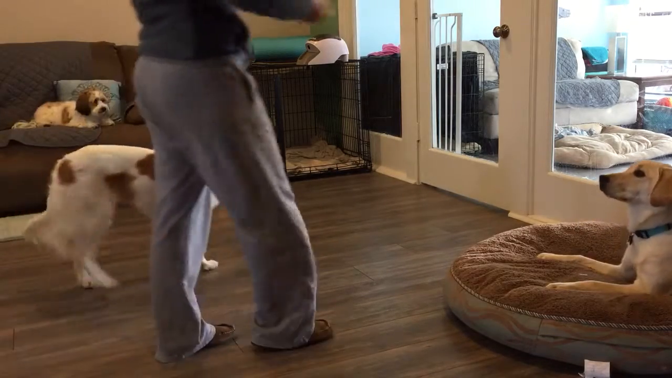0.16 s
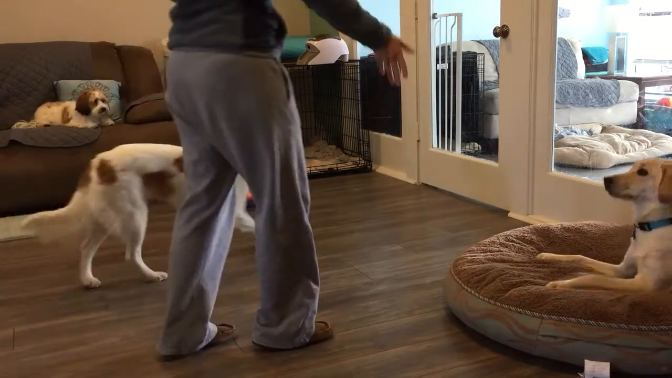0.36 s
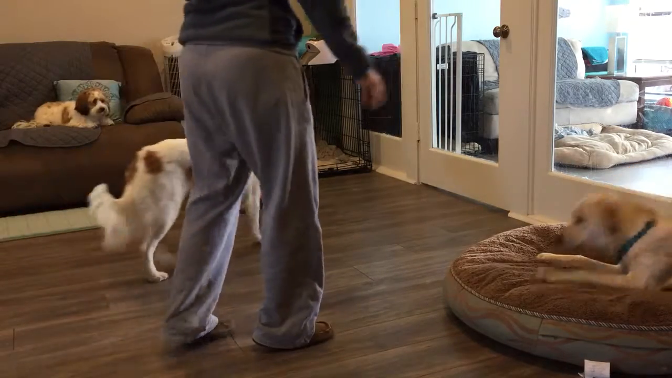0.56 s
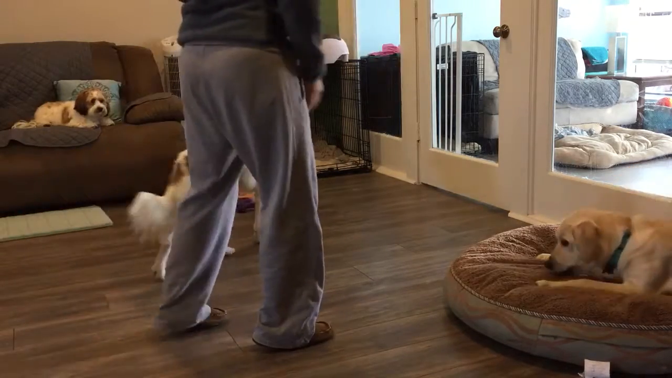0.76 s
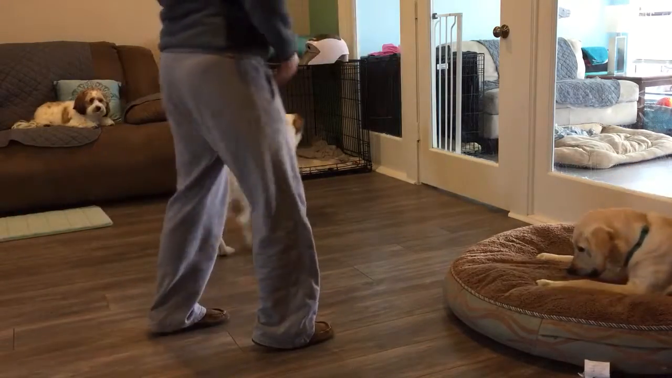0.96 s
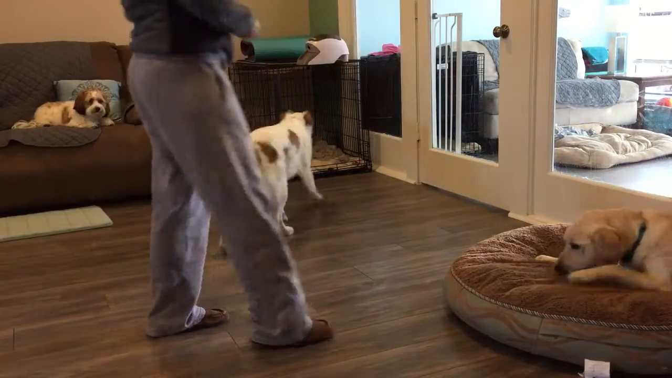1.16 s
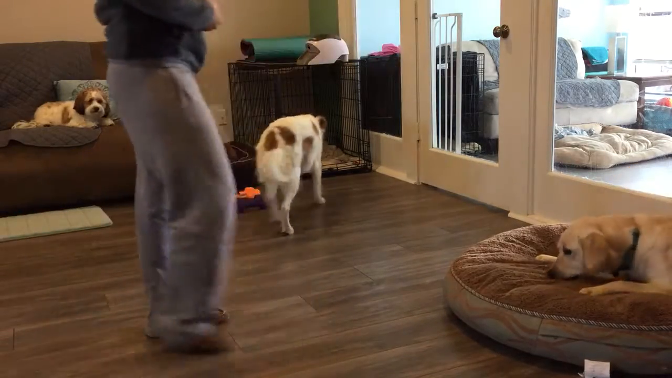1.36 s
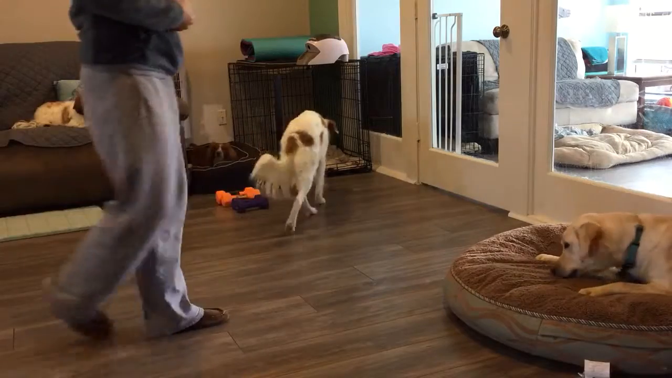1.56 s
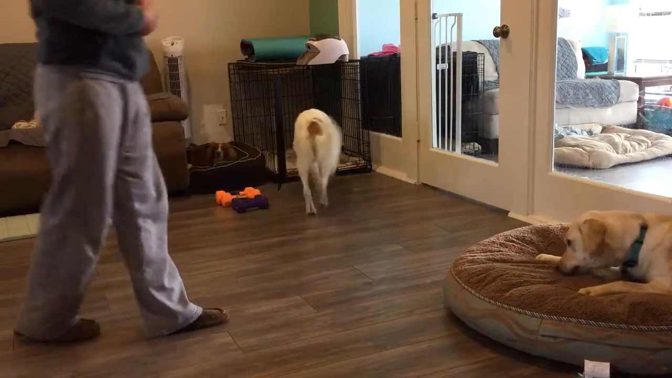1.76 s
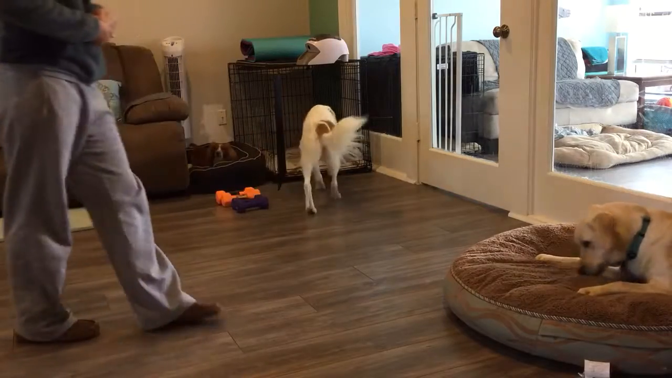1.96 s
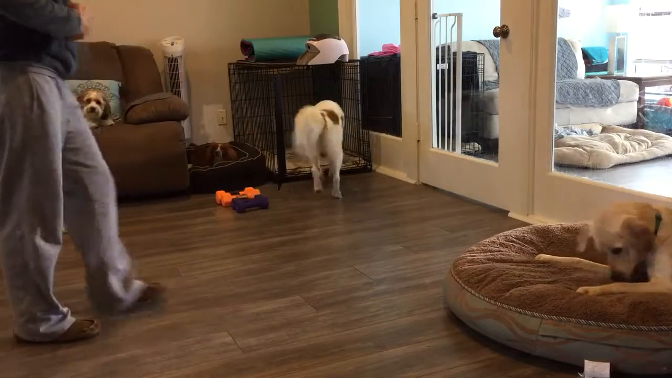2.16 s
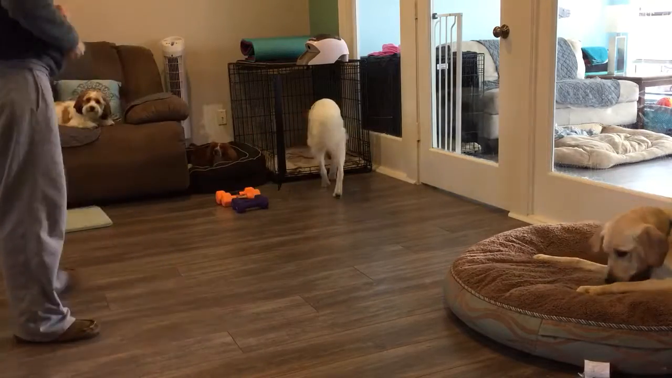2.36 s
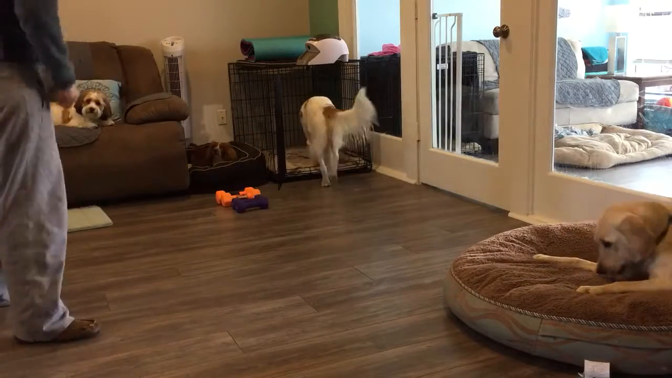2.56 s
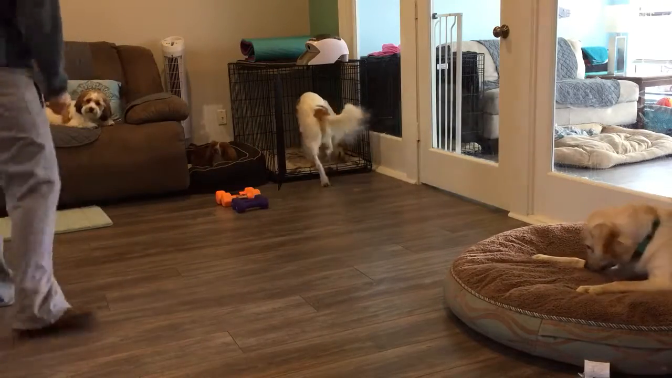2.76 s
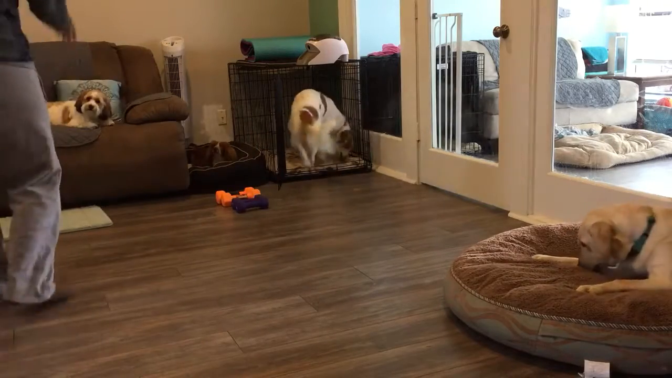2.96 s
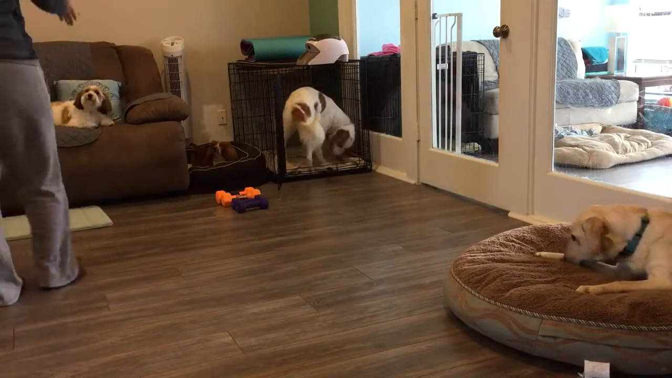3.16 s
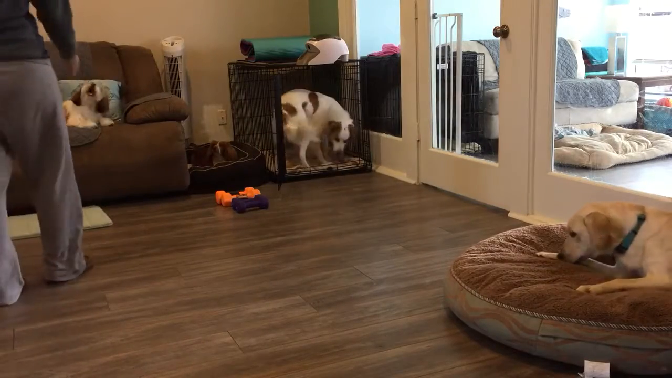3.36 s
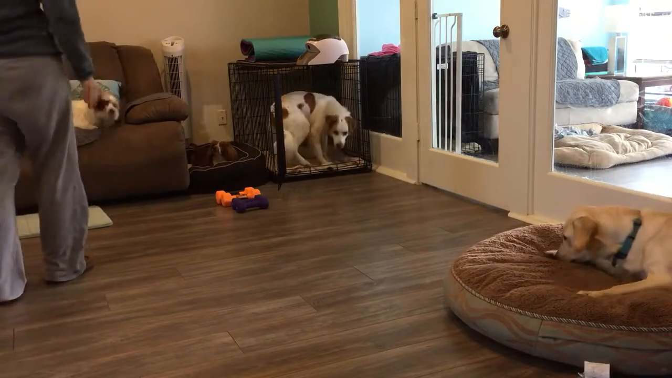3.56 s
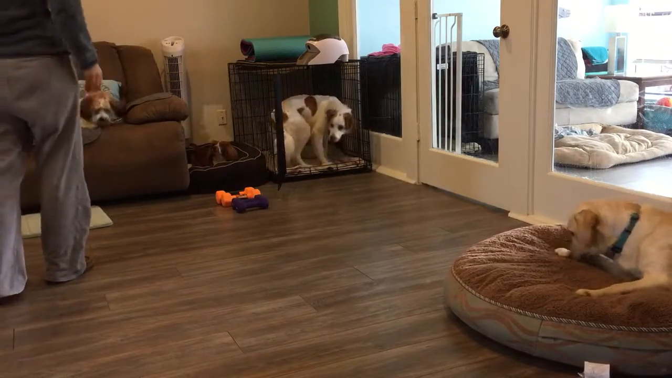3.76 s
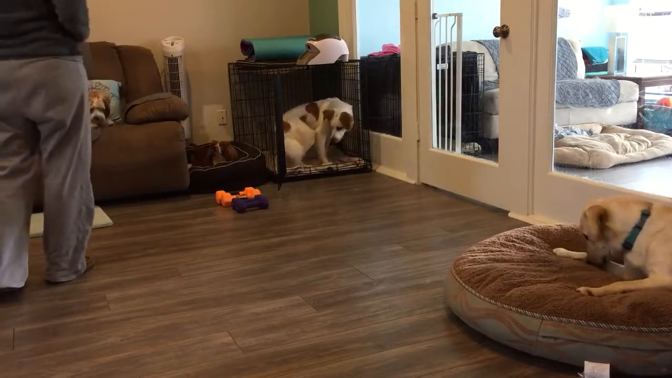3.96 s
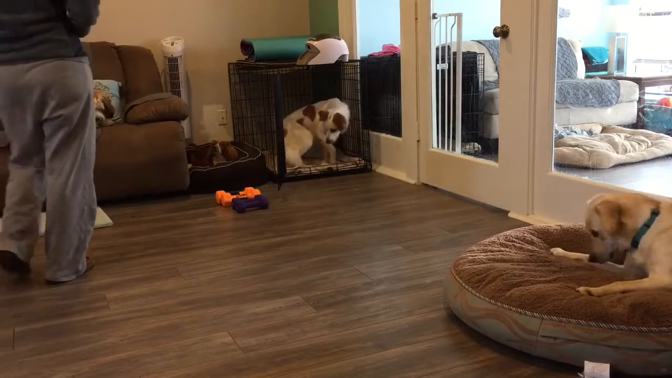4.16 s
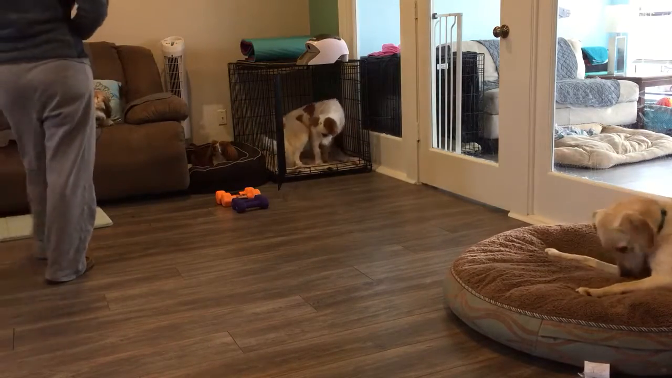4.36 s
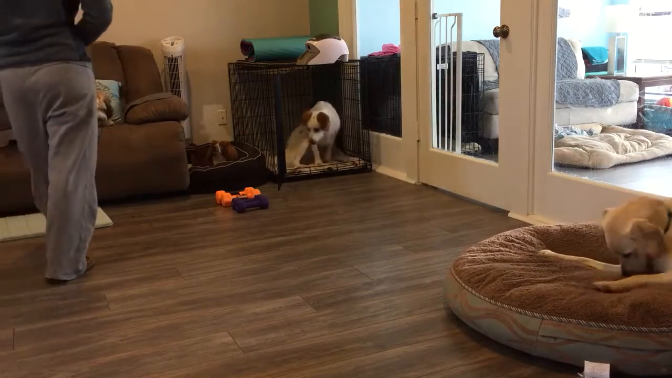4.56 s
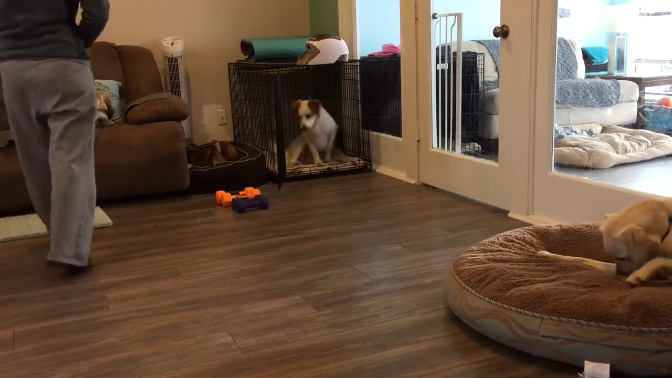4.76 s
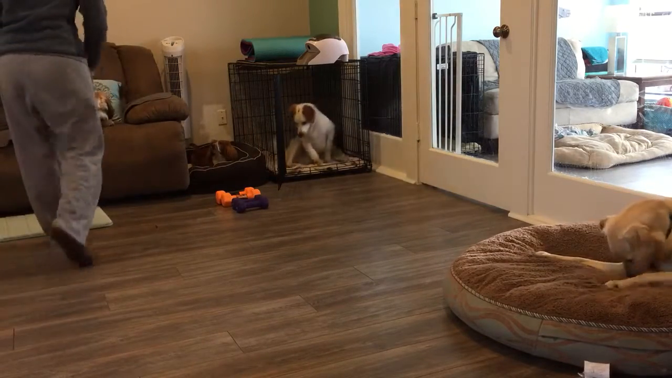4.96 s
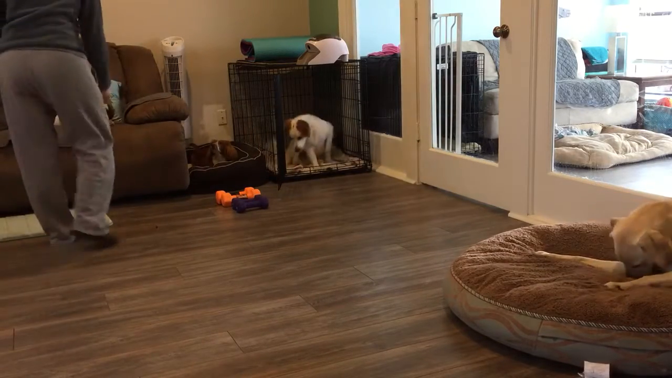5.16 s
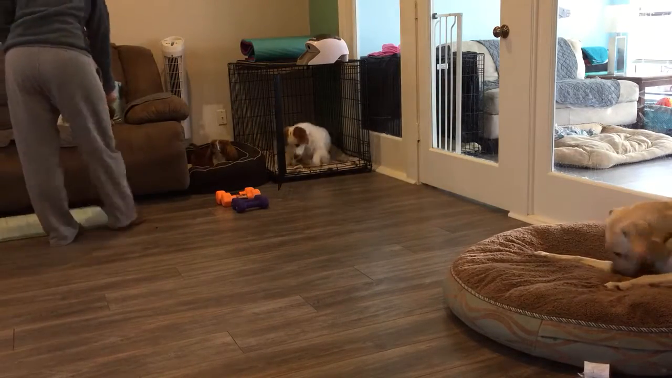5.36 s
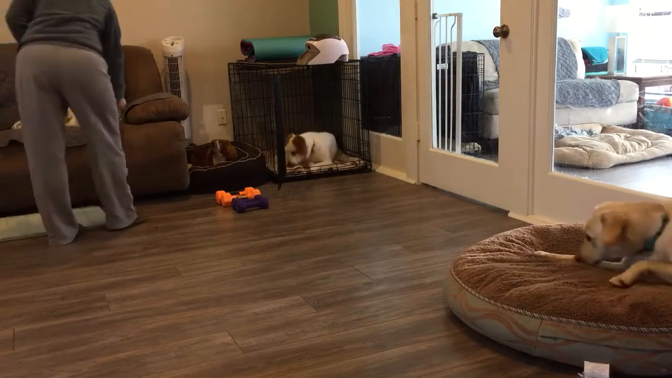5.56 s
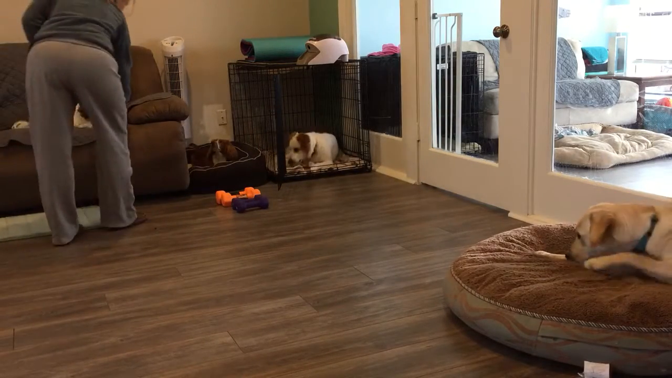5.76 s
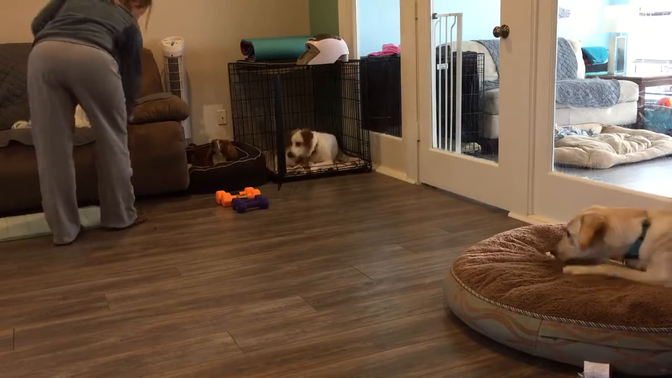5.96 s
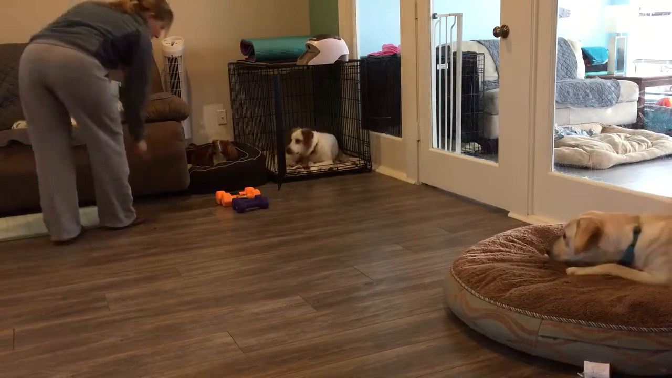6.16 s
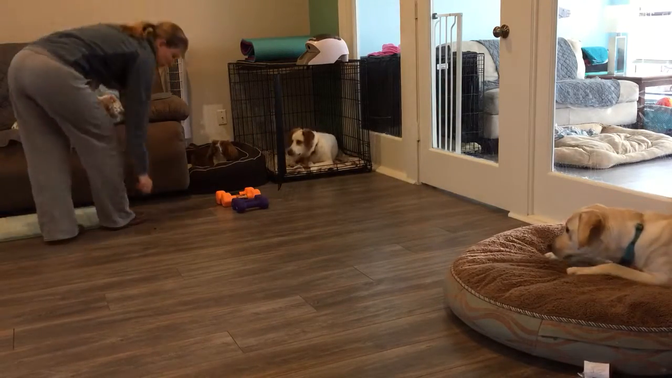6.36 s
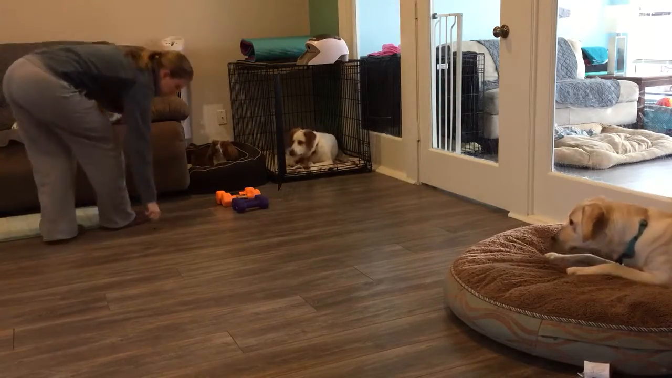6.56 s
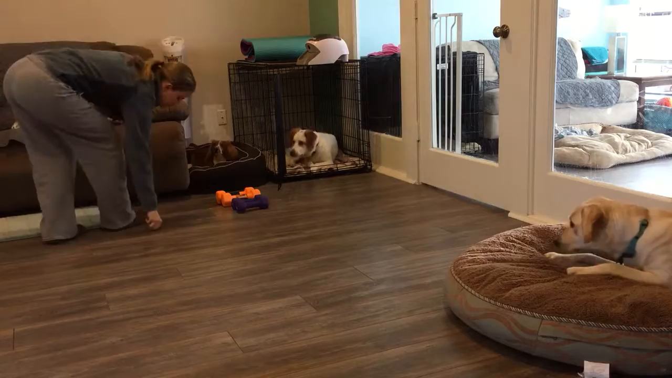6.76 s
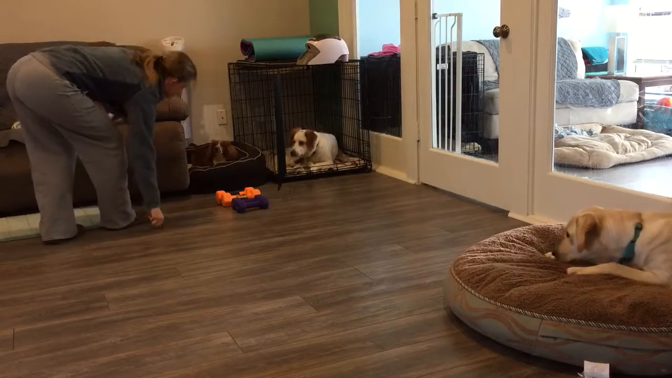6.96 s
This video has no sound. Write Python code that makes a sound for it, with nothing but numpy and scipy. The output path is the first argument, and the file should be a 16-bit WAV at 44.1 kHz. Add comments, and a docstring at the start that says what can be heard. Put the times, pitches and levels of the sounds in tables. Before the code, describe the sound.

A fan hums faintly and steadily in a living room with a short echo. From the start, a dog's claws click across a hard floor among soft steps, light slipper scuffs and a couple of faint squeaks. Metal collar tags jingle brightly from about 0.8 to 2.4 seconds, strongest near 1.1, with small clinks afterwards. At 2.6 seconds the plastic tray of a wire crate gives a loud, hollow knock, then another at 3, with dull paw thuds. At about 3.8 seconds a small hard object hits the floor with a sharp click and bounces, quicker and weaker, until 4.6. The tray knocks again near 4.2, then loudly at 4.8 and 5.2. Around 5.6 seconds the dog slides onto rustling bedding and the brushed wires ring thinly. Faint slipper scuffs and two tiny squeaks follow between 6.4 and 7 seconds over the hum.

```python
"""A fan hums and a collar ring clinks as a small dog trots over a hard living-room floor: pads thud,
claws click, metal tags jingle against each other. A person shuffles about in rubbing, squeaking slippers.
The dog climbs into a wire crate, whose plastic tray knocks and clatters as it turns round. A small hard
thing drops and bounces, and the dog slides down onto the bedding, brushing the wires so that they ring."""
import sys
import numpy as np
from scipy import signal
from scipy.fft import rfft, irfft
from scipy.io import wavfile

SR = 44100
rng = np.random.default_rng(int(sys.argv[2]) if len(sys.argv) > 2 else 0)


def master(y):
    """Save y as 16-bit WAV."""
    cut = np.clip(np.atleast_2d(y).T, -1, 1)
    pcm = np.round(cut * 32767)  # scale
    wavfile.write(sys.argv[1], SR, pcm.astype(np.int16))


N = 309141
TIME = np.arange(N) / SR
BLOW = TIME[:SR * 3 // 4]   # the clock of one short sound, in seconds


def from_db(db):
    """Turn decibels into a number to multiply by."""
    return 10 ** (np.asarray(db) / 20)


def fade(t, t60):
    """Die away by 60 dB in t60 seconds, the fade time."""
    return np.exp(-np.log(1000) * t / t60)


def unit_energy(x):
    """Scale a sound so that its energy is 1."""
    return x / np.sqrt(np.sum(x ** 2) + 1e-20)


def like_blow(x, t60):
    """Give a sound the energy of a blow that starts at strength 1 and fades in t60 seconds."""
    return unit_energy(x) * np.sqrt(np.sum(fade(BLOW, t60) ** 2))


def at_hz(points, hz):
    """Read between the rows of a table, with every octave equally wide."""
    known_hz, values = np.transpose(points)
    return np.interp(np.log(np.maximum(hz, 1)), np.log(known_hz), values)


def keep(x, hz, kind):
    """Keep the "low" part of a sound, the "high" part or a "band"."""
    return signal.sosfilt(signal.butter(2, hz, kind, fs=SR, output="sos"), x)


def resonate(x, hz, width_hz):
    """Let one pitch through and weaken the rest."""
    return signal.lfilter(*signal.iirpeak(hz, hz / width_hz, fs=SR), x)


def through(x, response):
    """Pass a sound through a thing, given that thing's response to one click."""
    return signal.fftconvolve(x, response)[:len(x)]


def colour(spectrum, size=8192):
    """The promptest (minimum-phase) click response that has this tone colour."""
    hz = np.arange(size // 2 + 1) * SR / size
    cepstrum = irfft(np.log(from_db(at_hz(spectrum, hz))))
    cepstrum[1:size // 2] *= 2
    cepstrum[size // 2 + 1:] = 0
    return unit_energy(irfft(np.exp(rfft(cepstrum))))


def ringing(notes, spread_db, scatter=0):
    """A struck thing rings; where it is hit changes each note's strength and, by scatter, its pitch."""
    hz, db, t60 = np.transpose(notes)[:, :, None]
    uneven, detune = rng.standard_normal((2, *db.shape))
    strength = unit_energy(from_db(db + spread_db * uneven))
    waves = np.sin(2 * np.pi * hz * (1 + scatter * detune) * BLOW)
    return np.sqrt(2) * np.sum(strength * waves * fade(BLOW, t60), axis=0)


def clatter(t60, grain_db, rise_s):
    """A contact swells as two surfaces meet, then breaks up into a dying flurry of tiny uneven hits."""
    force, size = rng.standard_normal((2, len(BLOW)))
    meeting = 1 - np.exp(-(BLOW / rise_s) ** 2)
    return like_blow(force * from_db(grain_db * size) * fade(BLOW, t60) * meeting, t60)


def add(track, s, sound):
    """Mix a sound into a track, starting at s seconds."""
    start = int(s * SR)
    track[start:start + len(sound)] += sound[:N - start]


# how long the room echoes: f/Hz, fade time/s
ECHO_TIMES = [(100, 0.63), (400, 0.46), (1000, 0.59), (2800, 0.48), (7000, 0.42), (15000, 0.27)]

def room(x, wet_db, first_echo_s=0.0095, build_s=0.0014):
    """A sound plus its echoes at level wet_db; they die sooner in the treble and differ at each spot."""
    noise, tail = rng.standard_normal((2, len(BLOW))), 0
    edges_hz = np.geomspace(50, 19000, 9)
    for k, band in enumerate(zip(edges_hz, edges_hz[1:])):
        t60 = at_hz(ECHO_TIMES, np.sqrt(np.prod(band)))
        tail = tail + keep(noise[k % 2], band, "band") * fade(BLOW, t60)
    build_up = np.clip((BLOW - first_echo_s) / build_s, 0, 1)
    return x + from_db(wet_db) * through(x, unit_energy(tail * build_up))


# tone colour of the moving air: f/Hz, relative level/dB
AIR_COLOUR = [(15, -29.5), (25, -47), (48, -3), (92, -7.5), (175, -13), (206, -3.5), (263, -14),
              (394, -13.5), (439, -21), (641, -21.5), (1940, -26.5), (2690, -27), (3620, -30.5),
              (5430, -32.5), (16000, -40.5)]
# the fan's low notes: f/Hz, level/dB, speed of wavering/Hz
HUM_NOTES = [(64.3, -74, 2.2), (203.5, -67.5, 5.5)]

def fan():
    """Air rushes steadily, and the hum wavers in strength and phase."""
    air = through(rng.standard_normal(N + SR), colour(AIR_COLOUR))[SR:]
    out = from_db(-66.5) * air
    for hz, db, waver_hz in HUM_NOTES:
        drifts = rng.standard_normal((2, 400))
        swell, sway = (np.interp(TIME * waver_hz * 2, np.arange(len(d)), d) for d in drifts)
        phase = 2 * np.pi * hz * TIME
        out += from_db(db) * ((1 + .8 * swell) * np.sin(phase) + .9 * sway * np.cos(phase))
    return out


# notes of the small collar ring: f/Hz, relative level/dB, undamped fade time/s
RING_NOTES = [(6340, -7, 0.27), (7000, -3, .17), (7400, -24, 0.32), (7600, -6.5, 0.48), (8770, 6.5, 0.38),
              (10030, 1.5, 0.27), (13600, -6, 0.12), (14800, -38, .09)]
# the ring clinks: t/s, level/dB
RING_CLINKS = [(0.109, -60), (0.129, -58), (.346, -65), (2.29, -64), (2.443, -57), (2.721, -59),
               (3.120, -54.5), (3.381, -57.5), (5.056, -60)]

def collar_ring():
    """A loose ring clinks, its notes cut very short and pitched a little differently each time."""
    out = np.zeros(N)
    for s, db in RING_CLINKS:
        metal = unit_energy(ringing(RING_NOTES, spread_db=2, scatter=.02) * fade(BLOW, .008))
        clink = through(clatter(0.11, grain_db=4, rise_s=.0004), metal)
        add(out, s, from_db(db) * room(clink, wet_db=-11.5))
    return out


# tone colour of a soft step: f/Hz, relative level/dB
STEP_COLOUR = [(40, -38), (100, -17), (150, 0), (210, 11), (300, -3), (480, -3.5), (750, -5), (2000, 3),
               (8000, -17)]
# soft steps: t/s, level/dB, hollow note of the spot f/Hz
SOFT_STEPS = [(.240, -50, 467), (.266, -62, 420), (0.714, -57.5, 168), (.878, -55.5, 412),
              (1.327, -59.5, 426), (1.653, -60.5, 770), (1.751, -55.5, 380), (2.664, -42.5, 293),
              (3.146, -47, 343), (3.176, -43, 255), (3.398, -54.5, 385), (3.846, -57.5, 440),
              (4.53, -56.5, 435), (4.649, -51.5, 490), (4.716, -53, 400), (4.783, -41.5, 500),
              (5.518, -54, 440), (5.604, -52, 159), (5.668, -52, 458), (5.722, -55, 560),
              (5.931, -61.5, 398)]

def footfalls():
    """Soles and pads press on floor and tray, making a dull push and a hollow note."""
    out, body = np.zeros(N), colour(STEP_COLOUR)
    for s, db, hz in SOFT_STEPS:
        t60 = 0.098 * from_db(0.44 * (db + 51.5))   # heavier steps last longer
        push = through(clatter(t60, grain_db=4.5, rise_s=0.0013), body)
        push = keep(push, 2.38 * hz, "low")
        note = resonate(clatter(t60, grain_db=-1, rise_s=0.00037), hz, width_hz=116)
        note = resonate(note, hz, width_hz=232)
        step = from_db(-2.5) * like_blow(push, t60) + from_db(-0.5) * like_blow(note, t60)
        add(out, s, from_db(db) * room(step, wet_db=-5.5))
    return out


# tone colour of the tapped floor: f/Hz, relative level/dB
PLANK_COLOUR = [(150, -46.5), (420, -9), (800, -23), (1500, -17), (2300, -8.5), (2900, -0.5), (3600, -14),
                (4600, -12), (6000, -11), (8800, -20.5), (11000, -25.5), (16000, -34)]

def tap_floor(track, s, db, sharp_db, hz, t60):
    """A faint, soft rush of noise leads into a click on the planks with a short ping."""
    planks = colour(PLANK_COLOUR)
    blow = from_db(db) * clatter(t60, grain_db=1, rise_s=0.0027)
    treble = from_db(sharp_db) * keep(blow, 6370, "high")
    click = from_db(-1) * through(treble - keep(blow, 3700, "low"), planks)
    ping = from_db(13.5) * keep(resonate(blow, hz, width_hz=1100), [1700, 7000], "band")
    lead_in = from_db(db - 12) * through(clatter(0.097, grain_db=3.5, rise_s=0.0052), planks)
    add(track, s - .008, lead_in)
    add(track, s, room(click, wet_db=-4) + room(ping, wet_db=-5))
    add(track, s + .009, through(treble, planks))   # the treble comes back off a near surface


# claws land: t/s, level/dB, treble boost/dB, ping f/Hz
CLAW_TAPS = [(0.254, -53.5, 4, 2340), (0.542, -65.5, -3, 3870), (0.911, -59.5, -2, 3120),
             (1.063, -44, 1, 3470), (1.318, -53, 1, 3580), (1.472, -43.5, -2.5, 3160),
             (1.883, -48, -13, 2780), (1.963, -56.5, -1, 2600), (2.148, -50, -6.5, 3020),
             (2.279, -60.5, -25, 3050), (2.571, -53, -9, 3130), (2.797, -50, -14, 2970)]

def claws():
    """The trotting dog's claws tap the floor, all equally briefly."""
    out = np.zeros(N)
    for s, db, sharp_db, hz in CLAW_TAPS:
        tap_floor(out, s, db, sharp_db, hz, t60=0.047)
    return out


# tone colour of rubbing cloth: f/Hz, relative level/dB
CLOTH_COLOUR = [(150, -21), (500, 4), (900, -8), (1500, -1.5), (2300, -0.5), (3400, 2), (4300, -4.5),
                (6000, -8.5), (9000, -11.5), (16000, -28)]
# strokes of slippers and bedding: loudest moment t/s, level/dB, rise time/s
CLOTH_STROKES = [(.544, -71, 0.024), (.676, -59.5, 0.038), (1.658, -59, 0.014), (2.861, -61, 0.0073),
                 (3.375, -60.5, .041), (5.603, -47, 0.018), (5.670, -63.5, 0.03), (6.450, -69.5, 0.075),
                 (6.580, -66.5, 0.032), (6.880, -72, 0.019)]

def scuffs():
    """Cloth catches and slips in fine grains under each stroke."""
    pressure = np.zeros(N)
    for s, db, rise_s in CLOTH_STROKES:
        swell = np.exp(-(np.minimum(TIME - s, 0) / rise_s) ** 2)
        pressure += from_db(db) * swell * fade(np.maximum(TIME - s, 0), t60=0.25)
    force, size = rng.standard_normal((2, N))
    grains = np.sqrt(N) * unit_energy(force * from_db(5.4 * size))
    return through(pressure * grains, colour(CLOTH_COLOUR))


# each tag's two notes: f/Hz, relative level/dB, undamped fade time/s
LARGE_TAG_NOTES = [(6540, 0, .5), (14175, -5, .35)]
SMALL_TAG_NOTES = [(7938, 0, .5), (14540, 0, .35)]
# tone colour of the tags rattling together: f/Hz, relative level/dB
RATTLE_COLOUR = [(2000, -44), (6700, -13), (9200, -5.5), (9900, 7), (10250, 11.5), (10900, -14),
                 (12200, -12), (13100, 0), (13700, 2), (14600, -23), (16000, 3.5)]

def tag_touch(large_db, small_db, rattle_db):
    """Two metal tags strike, chatter against each other and ring, each damping the other."""
    large = tag_ringing(LARGE_TAG_NOTES, large_db, firm_db=-73, spread_db=1) * (1 - fade(BLOW, .1))
    small = tag_ringing(SMALL_TAG_NOTES, small_db, firm_db=-46, spread_db=1.2)
    strike = clatter(.025, grain_db=3, rise_s=.0012)
    chatter = from_db(-17) * clatter(.14, grain_db=5, rise_s=.008)
    rattle = from_db(rattle_db) * through(strike + chatter, colour(RATTLE_COLOUR))
    return (large + small) * fade(BLOW, t60=0.35) + room(rattle, wet_db=-5.5)


def tag_ringing(notes, db, firm_db, spread_db):
    """One tag rings; a touch lighter than firm_db favours its upper note."""
    lower, (hz, upper_db, t60) = notes
    upper = (hz, upper_db + 0.26 * (firm_db - db), t60)
    return from_db(db) * ringing([lower, upper], spread_db)


# the tags jingle: t/s, then base level/dB for the large tag, the small tag and the rattle
TAG_JINGLES = [(.768, -76, -80, -57), (0.817, -55, -55, -50), (.888, -67, -62, -50), (0.924, -80, -66, -46),
               (0.967, -67, -72, -53), (1.089, -45.5, -50.5, -35), (1.320, -49.5, -78, -78),
               (1.702, -51, -54.5, -43), (1.908, -62, -58, -42.5), (2.344, -58.5, -64.5, -62),
               (3.621, -69, -60, -65), (3.733, -76, -72, -51), (3.79, -74, -68, -54),
               (4.020, -65, -71, -78), (4.141, -61, -78, -63), (5.056, -74, -70, -67)]

def collar_tags(trot_s=(.76, 1.58), touches_per_s=9):
    """In each jingle the tags touch, part and touch again; the trot adds faint touches of its own."""
    out = np.zeros(N)
    for s, large_db, small_db, rattle_db in TAG_JINGLES:
        add(out, s, tag_touch(large_db - 5.5, small_db, rattle_db))
        add(out, s + .025, tag_touch(large_db, small_db - 1, rattle_db - 7.5))
    for s in np.arange(*trot_s, 1 / touches_per_s):
        late_s = rng.uniform(0, .5 / touches_per_s)
        add(out, s + late_s, tag_touch(large_db=-72, small_db=-72, rattle_db=-66))
    return out


# soles squeak on the floor: t/s, level/dB, f/Hz
SOLE_SQUEAKS = [(1.655, -57, 1040), (2.343, -64.5, 1240), (6.566, -64.5, 1560), (6.953, -64, 2730)]

def squeaks(width_hz=260):
    """A sole sticks and slips for a moment."""
    out = np.zeros(N)
    for s, db, hz in SOLE_SQUEAKS:
        slips = clatter(0.04, grain_db=0, rise_s=0.0065)
        squeak = resonate(resonate(slips, hz, width_hz), hz, width_hz)
        add(out, s, from_db(db) * like_blow(squeak, 0.13))
    return out


# paws and body knock the tray: t/s, level/dB, fade time/s, boom/dB, hard edge/dB,
# hollow note of the spot f/Hz, head start of the graze/s, loss per rebound/dB
TRAY_KNOCKS = [(2.602, -27, 0.044, -4, 3.5, 1590, .012, 1), (3.031, -35.5, 0.014, -1.5, 6, 1490, 0, 7),
               (3.389, -58.5, 0.08, 17, 0, 770, 0.00046, 4), (4.177, -43, 0.089, 9.5, 6, 1670, .019, 5.5),
               (4.699, -50, 0.041, 1, 7, 477, 0.00057, 10), (4.775, -29, 0.046, 0, 8, 2170, 0.0026, 4),
               (5.221, -31.5, 0.041, -5, -1, 1180, .008, 1.4), (5.597, -53.5, 0.15, 9, 12, 1340, 0.024, 8)]
# the tray slaps back: t/s after the knock
REBOUND_DELAYS = [.008, .023]

def tray_contacts(tray_hz=1056):
    """Most knocks start with a graze; then come the blow and two weaker, duller rebounds."""
    for s, db, t60, boom_db, edge_db, spot_hz, graze_s, loss_db in TRAY_KNOCKS:
        if graze_s > 0:
            graze_db = -45.5 + 0.34 * (db + 33)   # heavier knocks graze harder
            yield s - graze_s, graze_db, 0.14, 2, 3.5, tray_hz
        yield s, db, t60, boom_db, edge_db, spot_hz
        for k, after_s in enumerate(REBOUND_DELAYS, 1):
            yield s + after_s, db - k * loss_db, 0.058, boom_db + 2 * k, edge_db - 8.5 * k, tray_hz


# tone colour of the plastic tray: f/Hz, relative level/dB
TRAY_COLOUR = [(60, -43), (150, -1), (330, -8), (480, 0.5), (700, 0.5), (1100, 1.5), (1700, 2.5),
               (2600, 0.5), (3500, -6.5), (4800, -18), (8000, -28.5), (16000, -49.5)]
# notes of tray and frame: f/Hz, relative level/dB, fade time/s
CRATE_NOTES = [(231, 0, .45), (790, -2, .45), (964, -2, .35), (1060, 1, .5), (1312, -2, .4), (1412, -1, .4),
               (1813, -5, .35), (2408, -7, .3), (2561, -8, .3)]

def crate():
    """The tray slaps on the wire base with a boom, an edge and a hollow note; the crate rings faintly."""
    out, tray = np.zeros(N), colour(TRAY_COLOUR)
    for s, db, t60, boom_db, edge_db, spot_hz in tray_contacts():
        blow = clatter(t60, grain_db=5.5, rise_s=0.00062)
        boom = from_db(boom_db) * keep(blow, 600, "low")
        middle = keep(keep(blow, 790, "high"), 1140, "low")
        edge = from_db(edge_db) * keep(blow, 1630, "high")
        slap = through(boom - middle + edge, tray)
        spot = keep(clatter(t60, grain_db=6, rise_s=0.003), [spot_hz / 1.096, spot_hz * 1.193], "band")
        hollow = from_db(-1.5) * like_blow(spot, t60)
        ring = from_db(-16) * ringing(CRATE_NOTES, spread_db=2) * (1 - fade(BLOW, .08))
        add(out, s, from_db(db) * (room(slap + hollow, wet_db=-4.5) + ring))
    return out


# the dropped thing lands: t/s, level/dB, treble boost/dB, ping f/Hz
LANDINGS = [(3.840, -42, 19, 3560), (3.846, -23, 0.5, 2840), (4.007, -39, -3.5, 2740),
            (4.183, -32, 3, 3200), (4.325, -40, 0, 3350), (4.446, -45, 1.5, 3560),
            (4.504, -51.5, -20, 3430), (4.55, -55.5, -26, 3240), (4.582, -53, -39, 2900)]

def dropped_thing():
    """A small hard thing bounces to rest; the harder it lands, the briefer the click."""
    out = np.zeros(N)
    for s, db, sharp_db, hz in LANDINGS:
        tap_floor(out, s, db, sharp_db, hz, t60=0.024 * from_db(-0.42 * (db + 43.5)))
    return out


# notes of the crate's wires: f/Hz, relative level/dB, fade time/s
WIRE_NOTES = [(3380, 0, .36), (3315, -4, .3), (4700, -9, .3), (5480, -8, .3), (5800, -6, .3)]
# the dog's side brushes the wires: t/s, level/dB
WIRE_BRUSHES = [(5.586, -46.5), (5.629, -53.5), (5.712, -63.5)]

def wires():
    """Brushed wires swell quickly into a thin ringing."""
    out = np.zeros(N)
    for s, db in WIRE_BRUSHES:
        ring = ringing(WIRE_NOTES, spread_db=3, scatter=0.0047)
        add(out, s, from_db(db) * ring * (1 - fade(BLOW, 0.047)))
    return out


def scene():
    """Add all the sounds together, the same for left and right."""
    mono = fan() + collar_ring() + footfalls() + claws()
    mono += room(scuffs() + squeaks(), wet_db=-7.5)
    mono += collar_tags() + crate() + dropped_thing() + wires()
    return np.stack([mono, mono])


def record(dry, cutoff_hz=15900):
    """Cut away the very highest treble, steeply."""
    return signal.sosfilt(signal.ellip(10, .1, 80, cutoff_hz, fs=SR, output="sos"), dry)


dry = scene()
out = record(dry)
master(out)
```